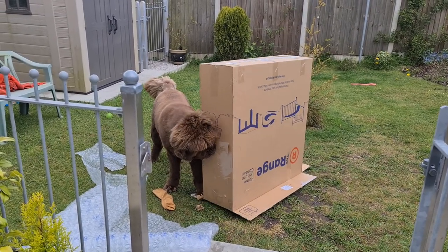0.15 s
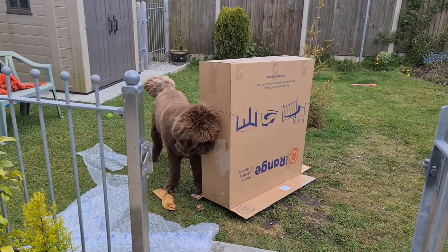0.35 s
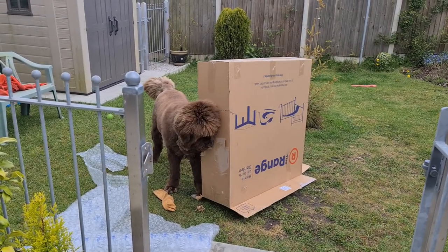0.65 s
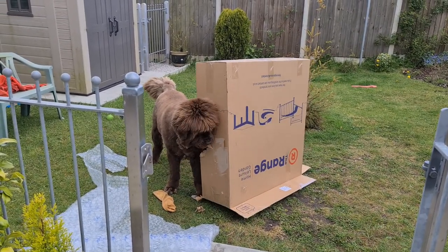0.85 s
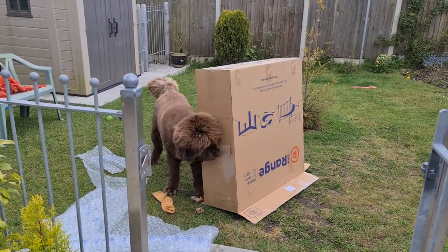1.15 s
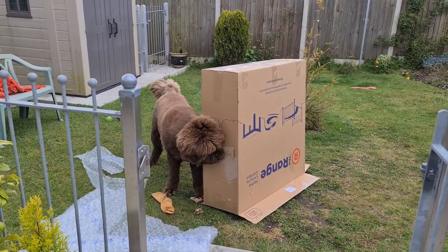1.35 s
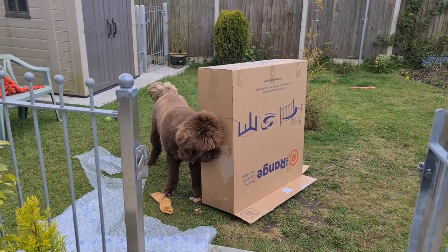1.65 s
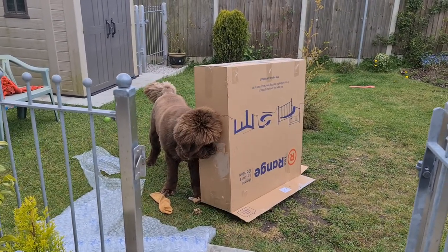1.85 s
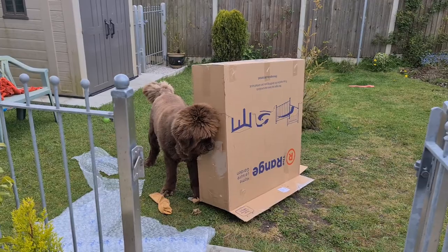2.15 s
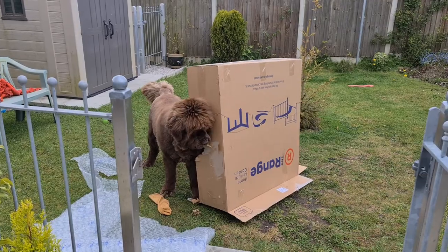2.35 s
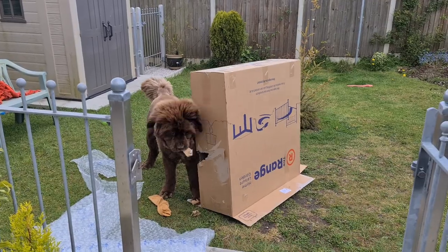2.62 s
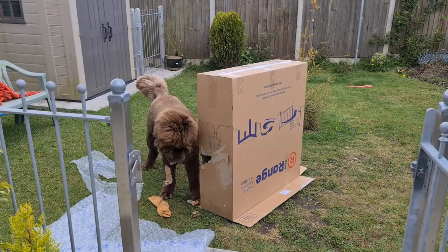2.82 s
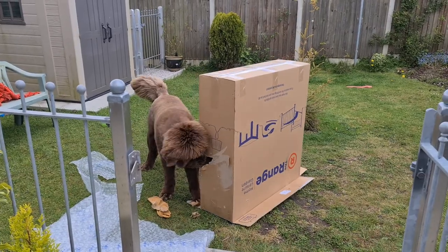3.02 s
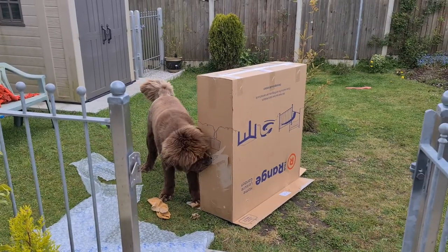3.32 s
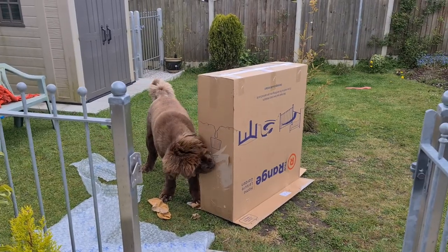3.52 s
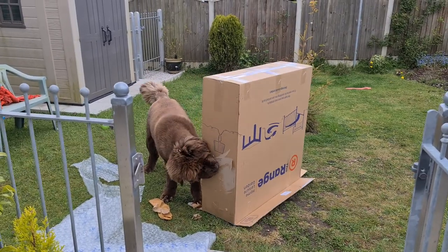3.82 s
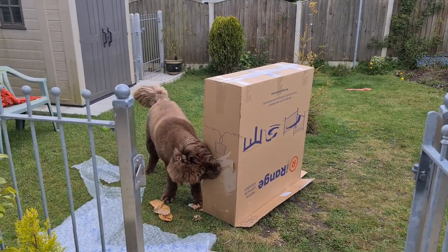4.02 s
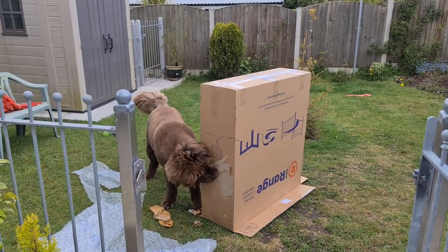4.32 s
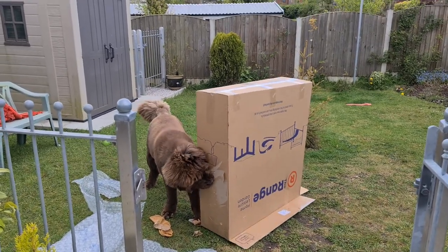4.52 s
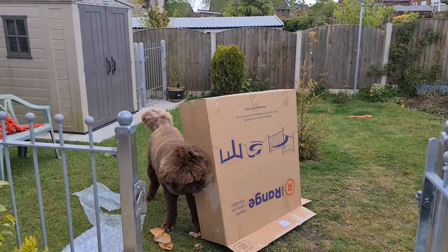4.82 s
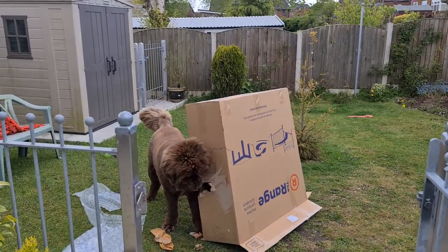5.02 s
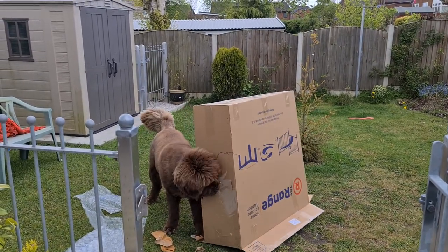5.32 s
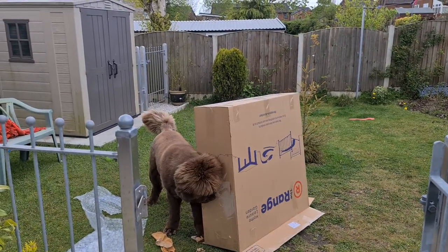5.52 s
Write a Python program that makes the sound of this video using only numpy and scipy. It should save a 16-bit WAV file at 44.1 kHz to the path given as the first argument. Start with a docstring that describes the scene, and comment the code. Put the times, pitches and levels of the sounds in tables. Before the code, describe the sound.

Cardboard cracks, rasps and thumps hollowly as a dog tugs at a large empty box outdoors, with faint birds over a soft suburban hum.

```python
"""On a garden lawn in a quiet suburb, a large dog bites, drags and tears a big empty cardboard box,
a few metres from a phone. Shoves and drags ring the resonances of the hollow box; snaps add ringing board and cracks.
Scraping, ripping, scuffing and tearing are grainy noise, coloured as stiff board or loose fibres.
Far birds are gliding, fluttering tones; fences answer with fading noise echoes, over a soft suburban hum."""
import sys
import numpy as np
from scipy import signal
from scipy.fft import rfft, irfft, next_fast_len
from scipy.io import wavfile
from scipy.ndimage import uniform_filter1d, map_coordinates

SR = 44100
rng = np.random.default_rng(int(sys.argv[2]) if len(sys.argv) > 2 else 0)


def transcribe(signal):
    """Save signal, clipped to [-1, 1], as a 16-bit WAV file at the path in sys.argv[1]."""
    frames = np.atleast_2d(signal).T
    limited = np.clip(frames, -1, 1)
    pcm = np.round(limited * 32767).astype(np.int16)
    wavfile.write(sys.argv[1], SR, pcm)


def level_to_linear(level):
    """Convert decibel levels to linear amplitude factors, elementwise."""
    exponent = np.asarray(level, float) / 20
    return 10 ** exponent


N = 250047
T = np.arange(N) / SR  # time of each sample, s


def unit(x):
    """Scales a sound to an rms of 1."""
    return x / np.sqrt(np.mean(x ** 2) + 1e-20)


def along(points, hz):
    """Reads a table of (hz, value) at any frequency, on a log axis."""
    point_hz, value = np.transpose(points)
    return np.interp(np.log(hz + 1), np.log(point_hz + 1), value)


def filtered(x, response):
    """Filters a sound by a complex response of frequency."""
    size = next_fast_len(N + SR // 2)
    return irfft(rfft(x, size) * response(np.fft.rfftfreq(size, 1 / SR)), size)[..., :N]


def wobble(rate):
    """A smooth random curve through rate random points a second (at most 400)."""
    return map_coordinates(rng.standard_normal(int(N / SR * 400) + 4), [T * rate])


def wide(pair, spectrum, alike):
    """Colours two unrelated noises and mixes them to stereo of rms 1, with the likeness the table asks for."""
    def mid_and_side(hz):
        angle = np.arccos(np.clip(along(alike, hz), -1, 1)) / 2
        return level_to_linear(along(spectrum, hz)) * np.array([np.cos(angle), np.sin(angle)])

    mid, side = filtered(pair, mid_and_side)
    return unit(np.array([mid + side, mid - side]))


def grains(share, break_db, clump_db):
    """Two rough noises: sparse fibre breaks, each a burst of about 1 ms, in clumps that both share."""
    breaks = (rng.random(N) < share) * level_to_linear(break_db) * rng.random(N) ** 2
    bursts = signal.lfilter([1], [1, -np.exp(-1000 / SR)], breaks)
    return rng.standard_normal((2, N)) * (1 + bursts) * level_to_linear(clump_db * wobble(90))


def patchy(pair, depth_db):
    """Bending board shifts its resonances: random gain patches a few hundred Hz wide and some 50 ms long."""
    z = signal.stft(pair, nperseg=512)[2]
    field = uniform_filter1d(rng.standard_normal(z.shape[1:]), size=4, axis=0)
    field = uniform_filter1d(field, size=10, axis=1)
    return signal.istft(z * level_to_linear(depth_db * unit(field)), nperseg=512)[1][:, :N]


def strokes(start_s, length_s, level_db, shape):
    """Gain of a row of strokes: each rises, sags (or swells) while it lasts, then dies away."""
    attack_s, sag_db_per_s, release_s = shape
    power = np.zeros(N)
    for s, length, db in zip(start_s, length_s, level_db):
        at = slice(round(s * SR), round((s + length + 0.42) * SR))
        t = T[at] - s
        rise = np.clip(t / max(attack_s, 0.001), 0, 1)
        die = np.exp(-np.clip(t - length, 0, None) / max(release_s, 0.002))
        power[at] += (level_to_linear(db - sag_db_per_s * np.minimum(t, length)) * rise * die) ** 2
    return np.sqrt(power)


# colour of the suburb's hum: hz, level_db (relative)
SUBURB_SPECTRUM = [(25, 4), (87, -7.5), (295, 7), (420, -29), (567, -6.5), (1770, -23), (3400, -33.5),
                   (4460, -21), (6340, -28.5), (10600, -22), (15100, -54)]
# how alike left and right are in the hum: hz, likeness (1 = the same)
HUM_LIKENESS = [(250, 0.97), (600, 0.9), (2000, 0.049), (10000, 0.29)]


def suburb():
    """The quiet suburb is steady coloured noise whose level wanders gently."""
    level_db = -61.5 + 0.28 * wobble(1.04) + 2.7 * wobble(4.46)
    return level_to_linear(level_db) * wide(rng.standard_normal((2, N)), SUBURB_SPECTRUM, HUM_LIKENESS)


# rough chirps of far birds: start_s, length_s, first_pitch_hz, settled_pitch_hz, level_db
CHIRP_NOTES = [(0.0, 0.13, 7600, 7300, -67), (0.28, 0.09, 7700, 7400, -64), (0.49, 0.13, 6500, 6050, -65),
               (2.72, 0.035, 6600, 4800, -73), (2.803, 0.175, 5300, 4870, -71),
               (2.955, 0.135, 4600, 3840, -67), (3.015, 0.025, 4350, 4280, -71),
               (3.085, 0.025, 3800, 3000, -72), (3.535, 0.02, 5300, 4800, -71)]
# thin whistles of far birds: start_s, length_s, first_pitch_hz, settled_pitch_hz, level_db
WHISTLE_NOTES = [(3.36, 0.14, 4280, 4280, -80), (3.87, 0.1, 4310, 4310, -71),
                 (5.385, 0.075, 4330, 4330, -74)]


def birds():
    """Each note glides onto its pitch or starts there, flutters about it and fades, soft at both ends."""
    out = np.zeros(N)
    settle_s = 0.007
    for notes, flutter in (CHIRP_NOTES, 0.024), (WHISTLE_NOTES, 0.003):  # flutter as a share of the pitch
        for s, length, first_hz, settled_hz, db in notes:
            since = np.clip(T - s, 0, None)
            fade = np.clip(np.minimum(T - s, s + length - T) / 0.005, 0, 1)
            pitch_hz = settled_hz + (first_hz - settled_hz) * np.exp(-since / settle_s)
            pitch_hz = pitch_hz * (1 + flutter * wobble(300))
            level_db = db - 30 * np.clip(T - s, 0, 1) + (2 + 150 * flutter) * wobble(110)
            out += fade * level_to_linear(level_db) * np.sin(2 * np.pi * np.cumsum(pitch_hz) / SR)
    return out


# how hard muzzle and fur work against the board: time_s, effort_db
EFFORT_CURVE = [(0.0, -55), (0.34, -51), (0.5, -56), (0.95, -55), (1.35, -56.5), (1.6, -52.5), (2.2, -51.5),
                (2.545, -45), (2.58, -57), (3.4, -63), (3.75, -57.5), (4.5, -64), (4.95, -53), (5.2, -57),
                (5.4, -58), (5.67, -58.5)]


def effort_gain(base_db, db_per_db):
    """Gain that follows the dog's effort: base_db at an effort of -60 dB, rising db_per_db for each dB more."""
    effort_db = np.interp(T, *np.transpose(EFFORT_CURVE))
    return level_to_linear(base_db + db_per_db * (effort_db + 60))


# resonances of the box's panels and air: pitch_hz, level_db, t60_s (time to fade by 60 dB)
BOX_MODES = [(50, -1, .24), (66, -8, .14), (104, 0, .13), (143, 4, .14), (180, 0, .11), (227, -4, .11),
             (297, -1, .12), (370, -10, .08), (465, -9, .08), (610, -8, .06), (722, -10, .06)]


def hollow(hz, colour_db):
    """Response of the hollow box: a sum of resonances, each at its own strength."""
    total = 0
    for (mode_hz, db, t60_s), extra_db in zip(BOX_MODES, colour_db):
        damping = 1j * hz * np.log(1000) / np.pi / t60_s
        total = total + level_to_linear(db + extra_db) * damping / (mode_hz * mode_hz - hz * hz + damping)
    return total


# the box is dragged over the grass: start_s, length_s, level_db
DRAG_STROKES = [(0.0, 0.47, -49), (0.892, 0.25, -55.5), (1.785, 0.17, -53.5), (2.158, 0.18, -50),
                (2.294, 0.05, -41.5), (2.386, 0.19, -34.5), (2.574, 0.06, -53), (3.66, 0.46, -56.5),
                (4.138, 0.1, -50), (4.26, 0.4, -49), (4.566, 0.16, -47.5), (4.734, 0.2, -37),
                (4.93, 0.17, -55.5), (5.235, 0.15, -57), (5.445, 0.21, -57)]
# course of a drag: attack_s, sag_db_per_s, release_s (time constant)
DRAG_COURSE = (0.002, 20.7, 0.0081)


def shuddering():
    """Dragging and effort shake the hollow box with grainy noise."""
    def response(hz):
        light_touch = 1j * hz / (60 + 1j * hz)  # light touches hardly move the big panels
        return hollow(hz, np.zeros(len(BOX_MODES))) * light_touch

    shake = unit(filtered(grains(0.002, 10.0, 3.6)[0], response))
    gain = effort_gain(-67.5, 1) + strokes(*np.transpose(DRAG_STROKES), DRAG_COURSE)
    return gain * shake


# how alike left and right are in the wide box: hz, likeness (1 = the same)
BOX_LIKENESS = [(300, 0.88), (700, 0.1), (1500, 0.6), (3000, 0.075), (12000, 0.044)]


def cardboard(spectrum, share, break_db, clump_db, depth_db):
    """Cardboard noise: grains of breaking fibre with shifting resonances, coloured and spread wide."""
    return wide(patchy(grains(share, break_db, clump_db), depth_db), spectrum, BOX_LIKENESS)


# colour of the stiff board: hz, level_db (relative)
BOARD_SPECTRUM = [(240, -33), (400, 0.5), (706, -3.5), (881, -65), (971, -3), (1090, 1), (1400, -1),
                  (1780, 3), (2300, -4), (3000, -11), (4200, -19.5), (5500, -36), (8800, -120)]


def stiff_board():
    """Endless noise of the stiff board, for others to switch on and off."""
    return cardboard(BOARD_SPECTRUM, share=0.005, break_db=9, clump_db=1.0, depth_db=2.8)


# colour of the fibres: hz, level_db (relative)
FIBRE_SPECTRUM = [(1650, -6.5), (2800, -5), (3700, -7), (4800, 1), (5400, -7), (5960, 0), (6970, -10.5),
                  (9380, 0.5), (12500, -1.5), (15900, -8), (16500, -59)]


def loose_fibres():
    """Endless bright noise of the fibres, for others to switch on and off."""
    return cardboard(FIBRE_SPECTRUM, share=0.004, break_db=10, clump_db=1.2, depth_db=2.5)


# teeth and claws pull along the board: start_s, length_s, scrape_db, rip_db (ripping fibres)
PULL_STROKES = [(0.227, 0.19, -60, -59), (0.382, 0.055, -44, -49.5), (0.606, 0.015, -53, -53),
                (0.631, 0.082, -50.5, -46.5), (0.795, 0.098, -41.5, -41.5), (1.067, 0.13, -59, -99),
                (1.542, 0.31, -58.5, -66), (1.765, 0.09, -53, -50), (1.87, 0.28, -59.5, -60.5),
                (2.128, 0.019, -49.5, -43.5), (2.184, 0.041, -44.5, -47), (2.246, 0.08, -42.5, -47),
                (2.323, 0.15, -42.5, -46), (2.788, 0.058, -60, -82), (3.108, 0.047, -41, -63),
                (3.183, 0.036, -55, -71), (3.345, 0.017, -73, -57), (4.094, 0.11, -51, -70),
                (4.264, 0.059, -52.5, -65), (4.318, 0.22, -67, -52.5), (4.541, 0.12, -43, -41.5),
                (4.693, 0.22, -54.5, -45.5), (4.855, 0.14, -45, -76), (5.03, 0.14, -53, -64),
                (5.262, 0.069, -56.5, -75)]
# course of a pull or a scuff: attack_s, sag_db_per_s, release_s (time constant)
PULL_COURSE = (0.025, 38, 0.012)


def pulling(board, fibres):
    """Teeth, claws, muzzle and fur scrape the stiff board and rip or rustle its fibres."""
    start_s, length_s, scrape_db, rip_db = np.transpose(PULL_STROKES)
    scrape = effort_gain(-65, 1) + strokes(start_s, length_s, scrape_db, PULL_COURSE)
    rip = effort_gain(-72, 2.04) + strokes(start_s, length_s, rip_db, PULL_COURSE)
    return scrape * board + rip * fibres


# teeth and folds snapping: start_s, level_db (each part is set against it), treble_over_level_db, ring_hz
SNAP_EVENTS = [(0.0733, -29.5, -34, 1700), (0.0915, -28.5, -35, 1650), (0.112, -36, -41, 1670),
               (0.16, -38, -24, 1700), (0.188, -30.5, -34, 1650), (0.208, -42, -34, 1750),
               (0.2335, -21, -27, 1580), (0.2535, -24.5, -17, 1750), (0.277, -23.5, -36, 1630),
               (0.3148, -36, -12.5, 1560), (0.4088, -23.5, -16, 1380), (0.6529, -14.5, -20.5, 1610),
               (0.8064, -20, -45, 2310), (0.846, -20, -37, 1275), (1.38, -22.5, -71, 1654),
               (1.5004, -31.5, -43, 2180), (2.1432, -28.5, -30, 1630), (2.197, -40, -15, 1410),
               (2.2868, -23, -42, 1380), (2.3017, -20, -41, 2040), (3.782, -23.5, -21.5, 1234),
               (3.902, -33.5, -12.5, 1170), (3.9663, -45, -0.5, 1100), (4.081, -33, -60, 870),
               (4.1067, -6.5, -23.5, 1120), (4.271, -33.5, -51, 1660), (4.539, -3.5, -27, 1875),
               (4.622, -19, -37, 1630), (4.727, -29, -11, 1740), (4.761, -24, -32, 1700),
               (4.8252, -26, -17, 1690), (4.8913, -10.5, -20.5, 1255), (4.9073, -11.5, -23, 2130),
               (5.225, -44, -12, 1990), (5.545, -51, 3.5, 1120)]


def snapping(board, fibres):
    """The board strains for a few ms and gives: the bitten patch rings, a crack and a crumbling tail follow."""
    ring, body, edge, crack = np.zeros((4, N + SR))
    t = np.arange(SR // 4) / SR
    lead = SR // 50  # samples of strain before the snap
    strain = 0.16 * np.exp(-t[lead:0:-1] / 0.0072)
    crumble_db = -60 * t / 0.079
    body_course = np.append(strain, level_to_linear(crumble_db) + 0.5 * level_to_linear(-60 * t / 0.0016))
    edge_course = np.append(strain, level_to_linear(1.58 * crumble_db) * (1 - np.exp(-t / 0.0001)))
    for s, db, over_db, ring_hz in SNAP_EVENTS:
        start = round(s * SR)
        after = slice(start, start + len(t))
        around = slice(start - lead, start + len(t))
        ring_gain = level_to_linear(db - 8.5 - 60 * t / 0.026) * (1 - np.exp(-t / 0.00054))
        ring[after] += ring_gain * np.sin(2 * np.pi * ring_hz * t)
        body[around] += level_to_linear(db - 20) * body_course
        edge[around] += level_to_linear(db + over_db) * edge_course
        crack[after] += level_to_linear(db + 0.54 * over_db - 3.5 - 60 * t / 0.01)
    # cracks carry little above 6660 Hz
    dull_fibres = unit(filtered(fibres, lambda hz: 1 / (1 + (hz / 6660) ** 4)))
    return ring[:N] + body[:N] * board + edge[:N] * fibres + crack[:N] * dull_fibres


# shoves on the box: start_s, level_db (peak), side_panel_sway_db, dullness (0-1)
SHOVE_EVENTS = [(0.258, -29.5, -27, 0.2), (0.274, -30, -12, 0.38), (0.403, -22, 4, 0.18),
                (0.652, -19, 5, 0.29), (0.808, -21, -6, 0.4), (0.845, -17.5, 16.5, 0.23),
                (1.126, -33, 5, 0.63), (1.884, -35, -18, 0.5), (2.141, -27, -3, 0.44),
                (2.194, -22, 3, 0.35), (2.285, -14.5, -3, 0.7), (2.332, -15, -2, 0.6),
                (2.348, -11.5, 5.5, 0.8), (3.106, -18, -21, 0.13), (3.703, -34, 12, 0.1),
                (3.779, -26.5, 9.5, 0.52), (3.882, -18, -0.5, 1), (4.108, -14, 11.5, 0.01),
                (4.54, -6, 15, 0.07), (4.568, -15, 37, 0.03), (4.618, -17.5, -29, 0.86),
                (4.906, -10.5, 15.5, 0.57), (5.211, -36, 2, 1)]


def shoves():
    """Each shove is one soft push and a dying rumble of contact, ringing the box modes at new strengths."""
    out = np.zeros(N + SR)
    t = np.arange(SR // 2) / SR
    hz = np.fft.rfftfreq(len(t), 1 / SR)
    rumble_s, muzzle_hz = 0.022, 790  # the soft muzzle and chest excite little above muzzle_hz
    for s, db, sway_db, dull in SHOVE_EVENTS:
        drive = 0.055 * rng.standard_normal(len(t)) * np.exp(-t / rumble_s)
        drive[0] = -1  # the push itself
        # a broad, dull contact feeds only the low modes
        soft = 1 / (1 + 1j * hz * max(dull, 0.02) / 150) ** 2 / (1 + 1j * hz / muzzle_hz) ** 3
        colour_db = rng.normal(0, 1.77, len(BOX_MODES))
        colour_db[:2] = sway_db  # the big side panel sways only when the whole box is rocked
        boom = irfft(rfft(drive) * soft * hollow(hz, colour_db))
        start = round(s * SR)
        out[start:start + len(t)] += level_to_linear(db) * boom / np.abs(boom).max()
    return out[:N]


# fur and claws scuff the smooth face of the board: start_s, length_s, level_db
SCUFF_STROKES = [(1.086, 0.23, -58), (1.4, 0.18, -60), (5.056, 0.091, -64)]


def scuffing(fibres):
    """Scuffs of fur and claws are one band of the fibre noise."""
    centre_hz, half_width_hz = 3350, 1080
    band = filtered(fibres, lambda hz: np.exp(-((hz - centre_hz) / half_width_hz) ** 2))
    return strokes(*np.transpose(SCUFF_STROKES), PULL_COURSE) * unit(band)


# the one long tear: start_s, length_s, level_db (at the start)
TEAR_STROKE = [(2.312, 0.25, -36.5)]
# course of the tear: attack_s, sag_db_per_s (negative: it swells), release_s (time constant)
TEAR_COURSE = (0.1, -25, 0.005)
# colour of the tear: hz, level_db (relative)
TEAR_SPECTRUM = [(210, -46), (350, -37), (499, 4.5), (877, -12), (1130, 5.5), (1540, -5.5), (1810, 2),
                 (3450, -36), (4610, -12), (6900, -26), (9370, -6.5), (15000, -8), (16500, -63)]


def tearing():
    """One long tear of grainy noise swells until the flap comes off."""
    noise = cardboard(TEAR_SPECTRUM, share=0.007, break_db=9, clump_db=1.2, depth_db=1.8)
    return strokes(*np.transpose(TEAR_STROKE), TEAR_COURSE) * noise


def box():
    """All sounds of the box; pulls, snaps and scuffs share the same board or fibre noise."""
    board, fibres = stiff_board(), loose_fibres()
    hollow_sounds = shuddering() + shoves()
    bitten_sounds = pulling(board, fibres) + snapping(board, fibres)
    return hollow_sounds + bitten_sounds + scuffing(fibres) + tearing()


# how fast the echoes die: hz, t60_s (time to fade by 60 dB)
FENCE_FADE = [(100, 0.72), (1000, 0.18), (4000, 0.15), (12000, 0.15)]


def fences(x):
    """Shed and fences answer on each side with a noise tail; each frequency dies at its own speed."""
    hz, t, z = signal.stft(rng.standard_normal((2, SR // 2)), SR, nperseg=256)
    fade = level_to_linear(-60 * t / along(FENCE_FADE, hz)[:, None])
    tail = signal.istft(z * fade, SR, nperseg=256)[1]
    # thin fences let the bass through
    tail = filtered(np.pad(tail, ((0, 0), (0, N))), lambda f: f * f / (f * f + 350 ** 2))[:, :SR // 2]
    late = np.pad(x, (260, 0))[None]  # the answer starts 260 samples late
    return signal.fftconvolve(late, tail / np.linalg.norm(tail[0]), axes=1)[:, :N]


# balance of the two ports: hz, left_over_right_db
PORT_BALANCE = [(200, 1), (1300, -3), (2400, -1.5), (4400, 1.5), (8000, -3), (15000, -9)]


def ports(x, lag_s):
    """The right port faces the sound: it hears it lag_s sooner and mostly brighter."""
    def response(hz):
        half = level_to_linear(along(PORT_BALANCE, hz) / 2) * np.exp(-1j * np.pi * hz * lag_s)
        return np.array([half, 1 / half])

    return filtered(x, response)


def scene():
    """Box and birds, direct and off the fences, over the hum of the suburb."""
    hum, far, near = suburb(), birds(), box()
    direct = ports(near, lag_s=0.00005) + far
    echoes = level_to_linear(-8.5) * fences(near[1]) + level_to_linear(3) * fences(far)
    return direct + echoes + hum


def top_cut(x):
    """Nothing passes above the cut-off."""
    return signal.sosfilt(signal.butter(12, 16620, fs=SR, output="sos"), x)


def record(dry):
    """The small microphones lose the deepest bass and the top treble."""
    def response(hz):
        bass_cut = (1j * hz / (38 + 1j * hz)) ** 3
        treble_cut = level_to_linear(-np.clip(hz - 15900, 0, None) / 15)  # 1 dB for every 15 Hz above 15900 Hz
        return bass_cut * treble_cut

    heard = filtered(dry, response)
    return top_cut(heard)


dry = scene()
out = record(dry)
transcribe(out)
```